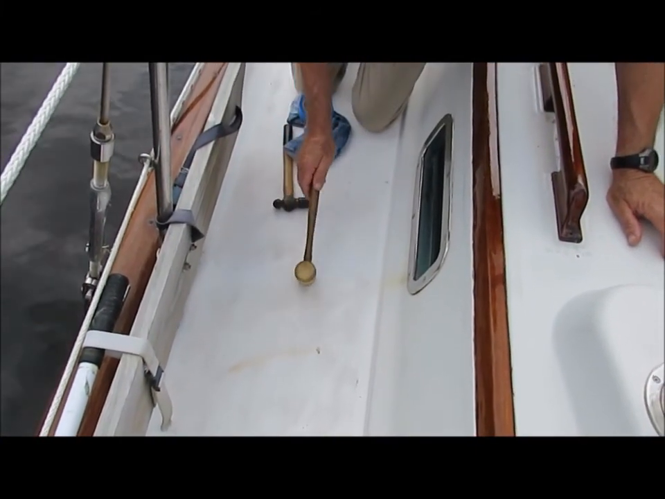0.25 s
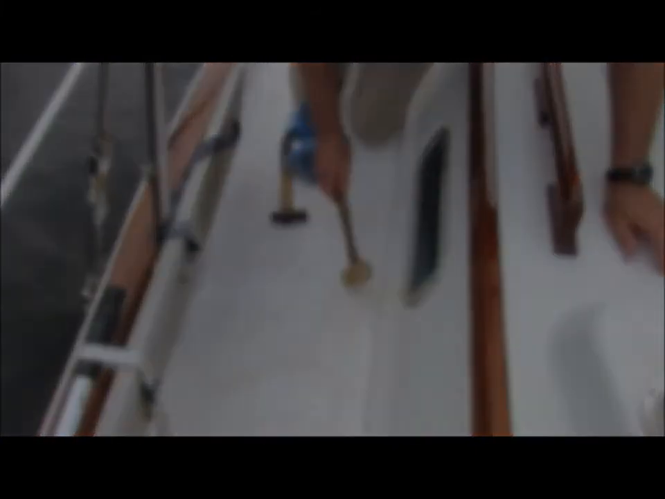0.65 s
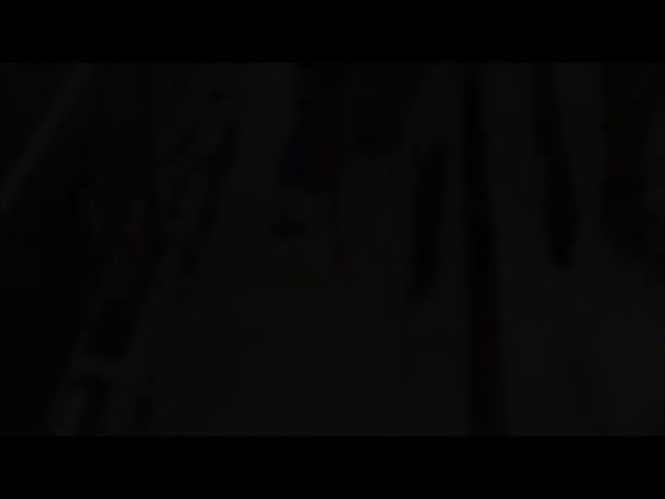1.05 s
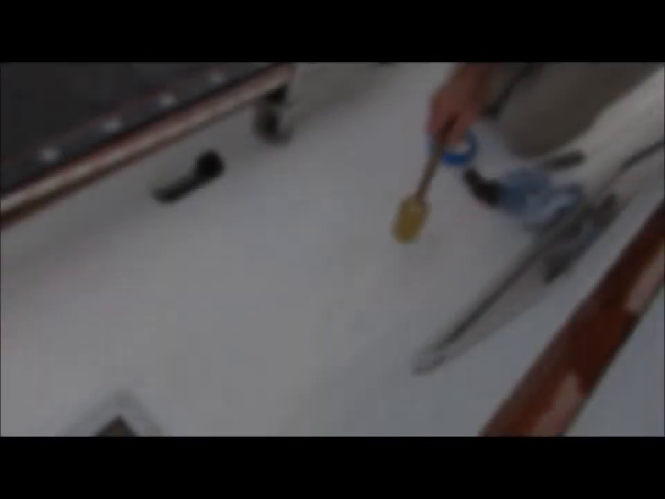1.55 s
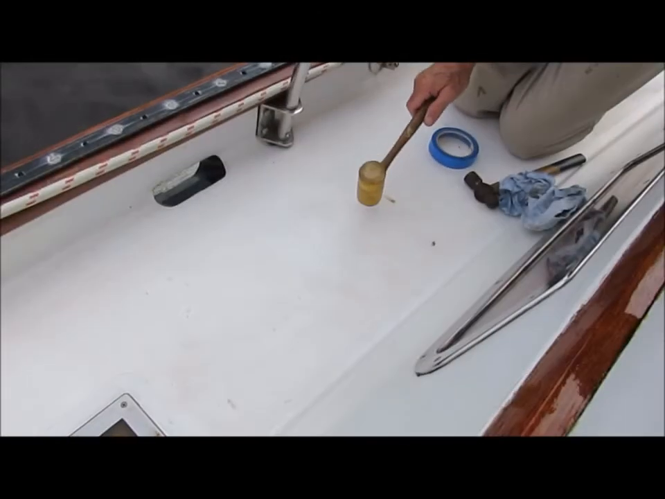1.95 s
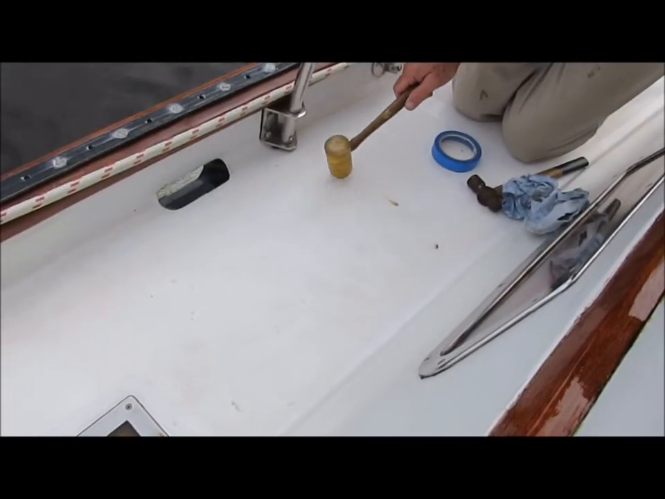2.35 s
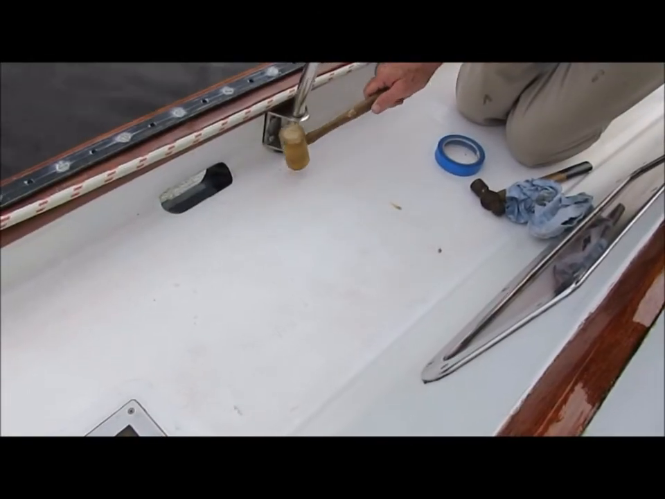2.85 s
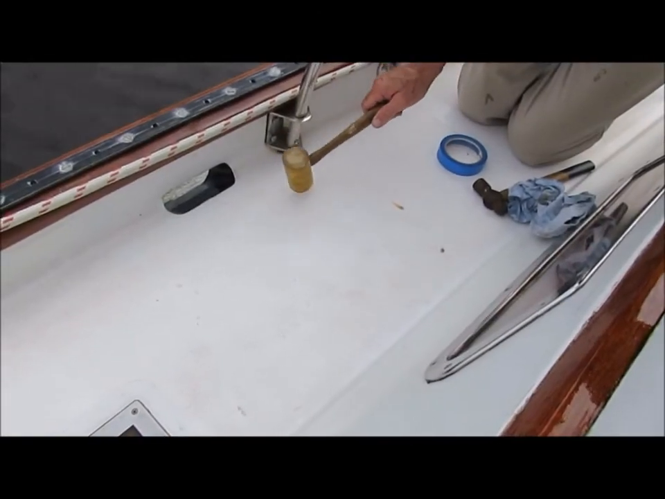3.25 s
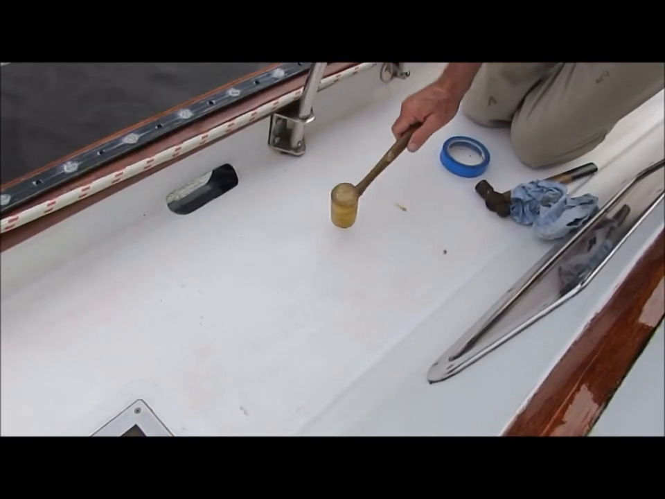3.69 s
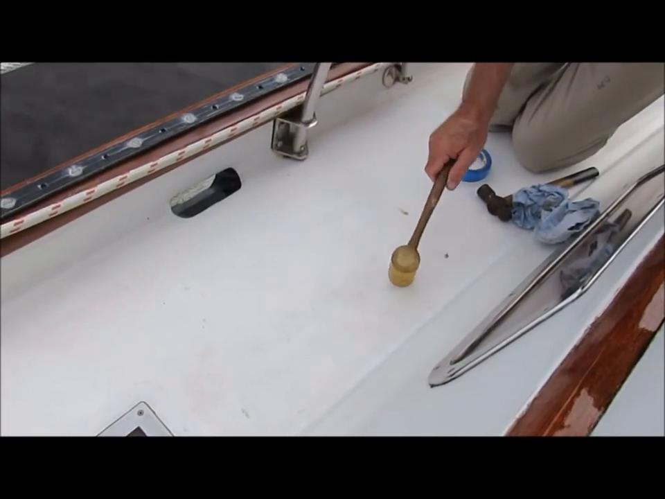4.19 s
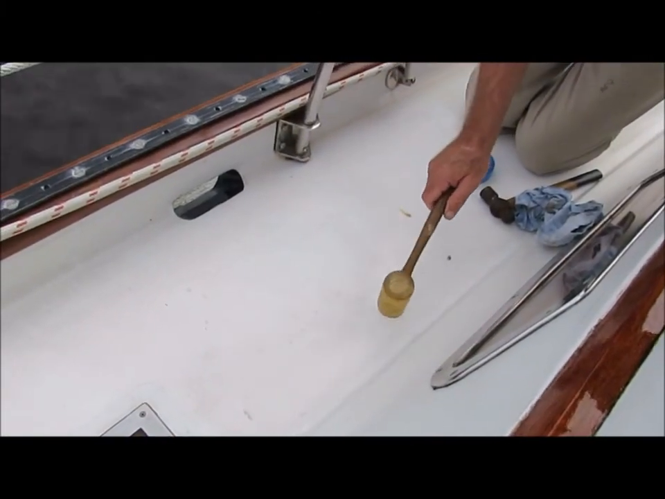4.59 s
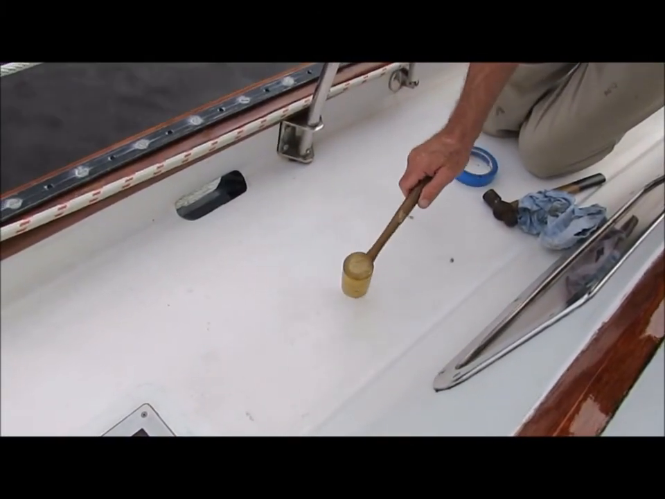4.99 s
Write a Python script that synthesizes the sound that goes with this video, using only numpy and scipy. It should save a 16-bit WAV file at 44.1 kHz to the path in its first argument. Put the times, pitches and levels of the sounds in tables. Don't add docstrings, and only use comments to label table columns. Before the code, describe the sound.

A plastic mallet taps a fiberglass boat deck about five times a second, knocks turning hollower and louder over faint harbor wash.

```python
import sys
import numpy as np
from scipy import signal
from scipy.fft import rfft, irfft, next_fast_len
from scipy.io import wavfile
from scipy.ndimage import uniform_filter1d

SR = 44100
rng = np.random.default_rng(int(sys.argv[2]) if len(sys.argv) > 2 else 0)


def rack_gain(trim_db):
    fader = np.asarray(trim_db, float)
    return 10 ** (fader / 20)


def int16_out(signal):
    q = np.round(np.clip(np.atleast_2d(signal).T, -1, 1) * 32767)
    wavfile.write(sys.argv[1], SR, q.astype(np.int16))


N = 230731
TIME = np.arange(N) / SR

# f/Hz, level/dB, t60/s, signed mode shape at the blow [ratio]
SIDE_PANEL = [(178, -23.5, 0.018, 0.73), (254.3, -22, 0.21, 0.38), (297.5, -4.5, 0.046, 0.91),
              (314, -7.5, 0.068, -0.6), (427, 0.5, 0.026, -1.02), (465, -3, 0.024, 1),
              (597, -11, 0.056, -0.61), (650, -13.5, 0.043, 0.9), (720, -10.5, 0.023, -1.9),
              (830, -30.5, 0.14, -0.67), (890, -18.5, 0.039, -1.4), (1113, -25, 0.038, -1.03),
              (1270, -37, 0.019, 0.88), (2100, -6, 0.0049, -1.6)]
RAIL_PANEL = [(172, -31.5, 0.084, 0.89), (263, -30, 0.22, 0.76), (303, -7, 0.048, 0.87),
              (321, -10.5, 0.063, -0.76), (434, 0, 0.03, -1.2), (456.5, 2.3, 0.02, 1),
              (580, 3.2, 0.026, -0.56), (642, -3, 0.023, 0.96), (728, -10, 0.064, -0.83),
              (803, -4.5, 0.029, -0.93), (810, -29, 0.024, -0.64), (1050, -9.5, 0.047, -0.77),
              (1222, -23, 0.067, -1.14), (1986, -0.5, 0.011, -1.03)]
SOLID_PANEL = [(105, -25.5, 0.12, 0.82), (209, -19.5, 0.046, 1), (337.8, -21, 0.067, -1.68),
               (367.7, -16.5, 0.073, -0.91), (407.5, -2.5, 0.019, 0.9), (516, -30, 0.14, 0.37),
               (532, -19, 0.046, -1.8), (580, -15.5, 0.026, -1.58), (693, -12.5, 0.023, -1.67),
               (854, -8, 0.017, -1.13), (1042, -1, 0.0063, -0.51), (1510, -27, 0.0029, -0.0047),
               (1836, -30, 0.069, -2.2), (2010, 5.5, 0.0037, -0.95)]
EDGE_PANEL = [(105, -24, 0.053, 0.36), (205.5, -21.0, 0.057, 0.77), (303.4, -34, 0.14, -0.87),
              (333, -16, 0.06, -0.77), (378.4, -26, 0.1, 0.9), (402, -19.5, 0.063, 1),
              (468.6, -18, 0.055, -1.06), (515, -7, 0.049, -0.63), (605, -24.5, 0.035, -2.4),
              (688, -18, 0.054, -0.9), (832, -24, 0.051, -1.05), (910, -49.5, 0.12, -0.55),
              (1200, -11, 0.0065, 0.94), (1430, -24.5, 0.0028, 1), (1790, 0.5, 0.027, -0.37)]
HOLLOW_PANEL = [(106, -25, 0.11, 0.45), (214.4, -19, 0.089, 0.99), (230.3, -17.5, 0.037, -0.82),
                (248, -8.5, 0.031, 0.94), (341, -7, 0.034, -0.98), (405.8, -13.5, 0.12, 0.44),
                (464.4, -4.5, 0.033, 0.81), (570, -16.5, 0.037, 1), (683, -0.5, 0.04, 0.75),
                (755, -5.5, 0.034, -0.82), (997, -19, 0.068, -0.98), (1098, 3.5, 0.025, 0.43),
                (1750, -0.5, 0.016, -1.24), (1960, 10, 0.032, 0.8)]
# t/s, level/dB, stiffness of the spot/dB, hardness of the blow/dB
SIDE_TAPS = [
    (0.042, -33, -5, -7),
    (0.2364, -28, -0.5, 6),
    (0.4514, -31, -1.5, 20.5),
    (0.651, -38.5, -1.3, 14),
]
RAIL_TAPS = [
    (0.8022, -33, -4.5, 3.5),
    (0.9912, -32, -2.5, 2.5),
    (1.1762, -35.5, 3.5, -0.5),
    (1.3514, -39.5, 1.5, 2),
    (1.5415, -48.5, 7, 2),
]
SOLID_TAPS = [(0.5559, -44.5, -3.5, 10), (0.7717, -37.5, -2, 9.5), (0.9711, -34, -5, 11.5),
              (1.2097, -31.5, -1, -4), (1.4236, -28, 0, -1), (1.6389, -27.5, -1.5, 5.5),
              (1.8498, -26, -2.5, 5.5), (2.0651, -26.5, 1, 4.5), (2.3136, -26, 3.5, -17),
              (2.5225, -23.5, 6.5, 6), (2.7372, -23.5, 7, 4), (2.9546, -23, 7, 3.5), (3.155, -23, 5, 1.5)]
EDGE_TAPS = [
    (3.3615, -24.5, -5.5, -20),
    (3.5612, -20.5, 3.7, 0.5),
    (3.7748, -22.5, 1.5, 3.2),
    (3.976, -21, 3.5, 13),
]
HOLLOW_TAPS = [
    (4.2039, -26.5, -5.5, -9.5),
    (4.432, -24.5, -3.5, 4),
    (4.6517, -20, -0.5, 3.5),
    (4.8807, -18.5, 1.5, 5.5),
    (5.0902, -16.5, 0, -19.5),
]
# ping f/Hz, ping level/dB, rattle level/dB,
# rattle decay/s
PINGS_AND_RATTLES = [
    (3680, -8.5, -5, 0.011),
    (2400, 0.5, -9, 0.0072),
    (1584, -1.5, -14.5, 0.0028),
    (1840, -8, -2.5, 0.0027),
    (2010, 10.5, -6, 0.0031),
]
# contact/s, boom level/dB, boom per stiffness [dB/dB],
# tick level/dB, tick per hardness [dB/dB]
ANSWERS = [
    (0.0013, -0.9, -1.8, -24, 0.19),
    (0.00075, 3.8, 0.17, -23, 3.1),
    (0.000954, -3, -0.03, -13, 0.37),
    (0.00106, 2, -0.15, -17.5, -.1),
    (0.001, 3, 0.83, -22.5, 0),
]


def mallet():
    tables = (SIDE_TAPS, RAIL_TAPS, SOLID_TAPS, EDGE_TAPS, HOLLOW_TAPS)
    panels = (SIDE_PANEL, RAIL_PANEL, SOLID_PANEL, EDGE_PANEL, HOLLOW_PANEL)
    blows = sum(taps(*run) for run in zip(tables, panels, PINGS_AND_RATTLES, ANSWERS))
    weak_below = signal.butter(3, 160.0, "highpass", fs=SR, output="sos")
    return signal.sosfilt(weak_below, blows)


def taps(table, panel, tail, answer):
    contact_s, boom_db, boom_per_stiff, tick_db, tick_per_hard = answer
    out = np.zeros((2, N + 16384))
    t = np.arange(12000) / SR
    fade = np.clip((t[-1] - t) / 0.05 - 1, 0, 1)
    for start_s, db, stiff_db, hard_db in table:
        colour_db = [boom_db + boom_per_stiff * stiff_db, 0, stiff_db, hard_db]
        body = knock(panel, colour_db, contact_s, t)
        snap = rack_gain(tick_db + tick_per_hard * hard_db) * tick(t, tail)
        hull = murmur(t)
        blow = ports(body + snap + hull[0]) + rack_gain(5.0) * hull[1:]
        start = int(start_s * SR)
        out[:, start:start + len(t)] += rack_gain(db) * fade * blow
    return out[:, :N]


COLOUR_HZ = (250, 450, 720, 1200)


def knock(panel, colour_db, contact_s, t):
    hz, db, t60, shape = np.transpose(panel)[:, :, None]
    chance = rng.standard_normal((2, len(panel), 1))
    omega = 2 * np.pi * hz * (1 + 0.003 * chance[0])
    mode_db = db + np.interp(np.log(hz), np.log(COLOUR_HZ), colour_db) + 0.6 * chance[1]
    size = shape * rack_gain(mode_db)
    decay = np.exp(-np.log(1000) * t / t60)
    bend = np.sum(size / omega ** 2 * np.sin(omega * t) * decay, axis=0)
    push = np.sin(np.pi * np.clip(t[:200] / contact_s, 0, 1)) ** 2
    sound = np.diff(np.convolve(bend, push)[:len(t)], 2, prepend=[0, 0])
    return sound / np.sqrt(np.mean(sound[:500] ** 2))


# f/Hz, level/dB
TICK = [(1500, -4.4), (2500, 2.5), (3800, -16.5), (5000, -16.5), (8000, -23), (12000, -29.5),
        (16000, -35.5)]


def tick(t, tail):
    ping_hz, ping_db, rattle_db, rattle_s = tail
    swell = t / rattle_s * np.exp(1 - t / rattle_s * 2.46)
    grit = rng.standard_normal((2, len(t))) * swell
    scrape = 0.15 * rng.standard_normal(len(t)) * np.exp(-np.abs(t - 0.0007) / 0.0004)
    contact = (np.arange(len(t)) == 30) + scrape
    click = band(colour(contact, TICK), 5000.0, 4.0)
    rattle = band(colour(grit[0], TICK), 5000.0, 4.0)
    ping = band(grit[1], ping_hz, 0.7)
    parts = zip((click, rattle, ping), (0, rattle_db, ping_db))
    return sum(rack_gain(db) * part / np.max(np.abs(part)) for part, db in parts)


# f/Hz, level above the tap/dB, t60/s
HULL = [(238, -28, .13), (407, -26, 0.17), (635, -28, 0.12), (915, -25.5, 0.1), (1318, -31.5, 0.072),
        (2380, -43.5, 0.057)]


def murmur(t):
    swell = 1 - np.exp(-t / 0.0002)
    out = 0
    for hz, db, t60 in HULL:
        noise = rng.standard_normal((3, len(t)))
        noise = unit(band(band(noise, hz, 0.75), hz, 0.75))
        out = out + rack_gain(db) * noise * swell * np.exp(-np.log(1000) * t / t60)
    return out


def shackle():
    age = np.maximum(TIME - 4.7155, 0)
    metal = unit(band(rng.standard_normal(N), 3600.0, 1.5))
    return rack_gain(-65.5) * ports(metal * (age > 0) * np.exp(-age / 0.0018))


# t/s, firing f/Hz
HUM = [
    (0, 104),
    (1.3, 105),
    (2.15, 98),
    (2.3, 106.5),
    (2.75, 110),
    (3.4, 111.4),
    (4.7, 110),
    (4.9, 106),
    (5.23, 110),
]


def engine():
    enters_s, fade_s, hidden_db = 0.895, 0.35, -15.5
    hz = np.interp(TIME, *np.transpose(HUM))
    waver = 0.65 + 0.55 * (walk(20) + 1j * walk(20))
    note = np.real(waver * np.exp(2j * np.pi * np.cumsum(hz) / SR))
    hidden = np.clip(1 - (TIME - enters_s) / fade_s, 0, 1)
    level_db = -58.5 + 0.4 * (hz - 110) + hidden_db * hidden
    return rack_gain(level_db) * ports(note)


# t/s, level/dB
HARBOUR = [
    (0.0, -3.5),
    (1.15, -3.5),
    (1.35, -1),
    (2.0, -1),
    (2.5, 1.5),
    (3.2, -1.5),
    (3.48, 1.5),
    (3.8, -1.1),
    (4.76, 5.5),
    (5.23, 4.5),
]
# f/Hz, level/dB per Hz
WASH = [(20, -14), (45, -5.5), (80, -0.5), (120, -3.5), (150, -7.5), (300, -7.5), (450, -14), (950, -16),
        (1550, -27.5), (2300, -36), (3000, -33.5), (3900, -41), (9000, -45), (16000, -59)]


def harbour():
    wash_db = np.interp(TIME, *np.transpose(HARBOUR))
    hiss_db = 0.94 * wash_db
    wind_db = 1.5 * wash_db + 4.5 * walk(10)
    size = next_fast_len(N)
    shared = rfft(ports(colour(rng.standard_normal(size), WASH)))
    apart = rfft(colour(rng.standard_normal((2, size)), WASH))
    octave = np.log2(np.maximum(np.fft.rfftfreq(size, 1 / SR), 1))
    like = np.clip(np.interp(octave, np.log2([140, 400, 2000]), [0.85, 0.3, 0.08]), 0, 1)
    lean = rack_gain(np.interp(octave, np.log2([199, 395, 990, 1320]), [0.7, 5.3, 5.1, 0.39]))
    sides = np.array([lean, np.ones_like(lean)])
    wash = np.sqrt(like) * shared + np.sqrt(1 - like) * apart * sides
    out = 0
    for hz in 21 * 2 ** np.arange(0, 10, 0.5):
        db = wind_db if hz < 100 else wash_db if hz < 1800 else hiss_db
        window = np.clip(1 - 2 * np.abs(octave - np.log2(hz)), 0, 1)
        flicker_db = 0.7 * walk(9)
        out = out + rack_gain(db + flicker_db) * irfft(wash * window, size)[:, :N]
    return rack_gain(-62.5) * unit(out)


# delay/s, gain [ratio]
LEFT_PATHS = [
    (.00018, 0.48),
    (.00096, 0.66),
    (.00166, -0.43),
]


def ports(x):
    shadow_cycles = 0.62
    size = next_fast_len(len(x))
    f = np.fft.rfftfreq(size, 1 / SR)
    paths = 0
    for delay, gain in LEFT_PATHS:
        dull = 1 / np.sqrt(1 + (f * delay / shadow_cycles) ** 2)
        paths = paths + gain * np.exp(-2j * np.pi * f * delay) * dull
    left = irfft(rfft(x, size) * paths, size)[:len(x)]
    return np.array([left, x])


def unit(x):
    return x / np.sqrt(np.mean(x ** 2))


def band(x, hz, octaves):
    edges = hz * 2 ** (np.array([-octaves, octaves]) / 2)
    edges = np.minimum(edges, SR / 2.1)
    return signal.sosfilt(signal.butter(2, edges, "bandpass", fs=SR, output="sos"), x)


def colour(x, table):
    hz, db = np.transpose(table)
    size = next_fast_len(x.shape[-1])
    f = np.maximum(np.fft.rfftfreq(size, 1 / SR), 1)
    gain = rack_gain(np.interp(np.log(f), np.log(hz), db))
    return irfft(rfft(x, size) * gain, size)[..., :x.shape[-1]]


def walk(rate):
    hold = int(SR / rate)
    steps = np.repeat(rng.standard_normal(N // hold + 1), hold)
    slewed = uniform_filter1d(uniform_filter1d(steps, hold), hold)
    return 1.3 * slewed[:N]


def scene():
    return mallet() + shackle() + engine() + harbour()


def band_limit(x):
    return signal.sosfilt(signal.butter(12, 15900, fs=SR, output="sos"), x)


def record(dry):
    return band_limit(dry)


dry = scene()
out = record(dry)
int16_out(out)
```